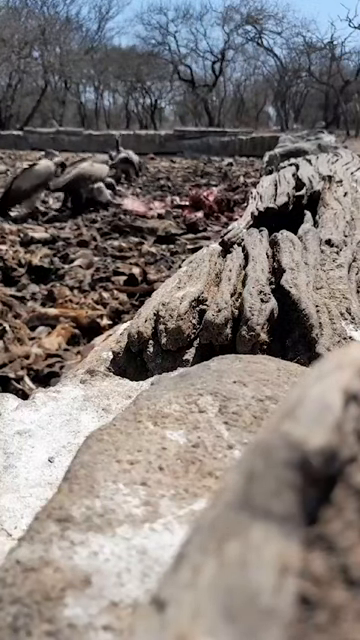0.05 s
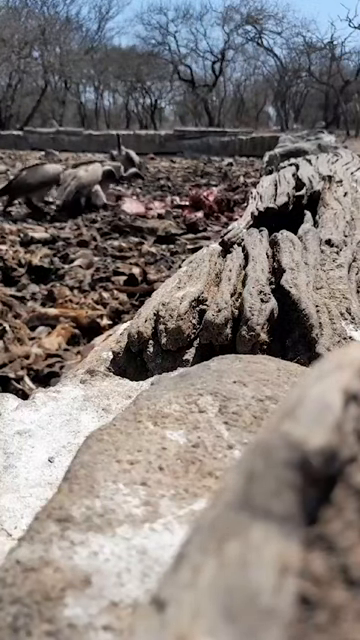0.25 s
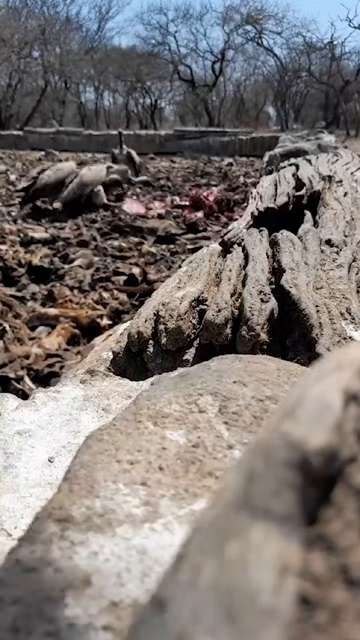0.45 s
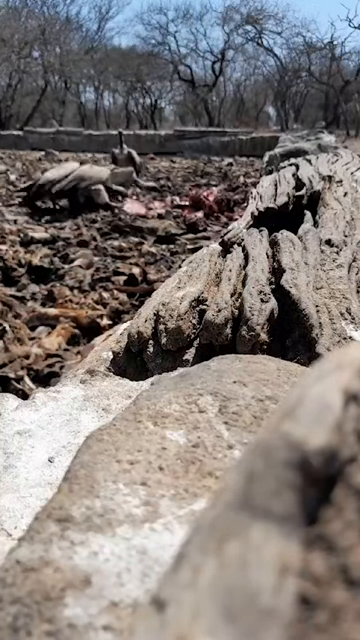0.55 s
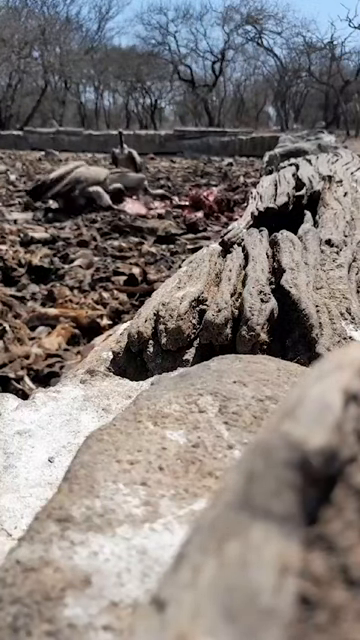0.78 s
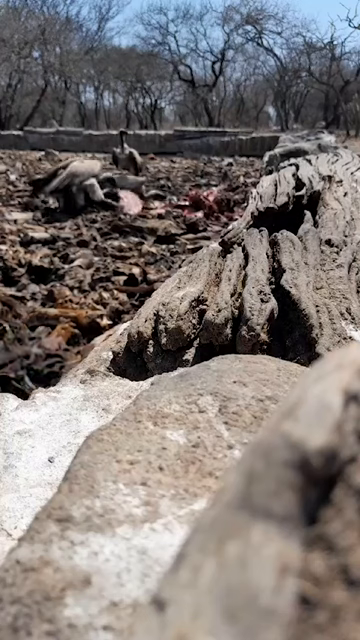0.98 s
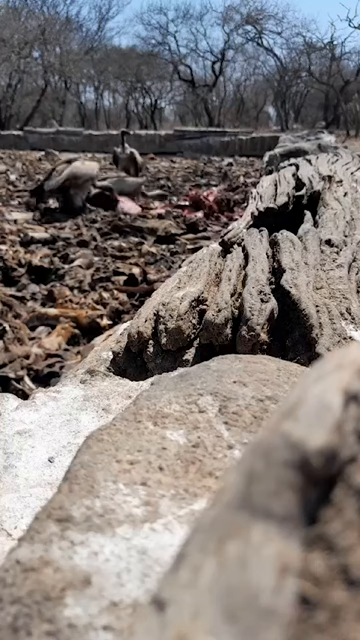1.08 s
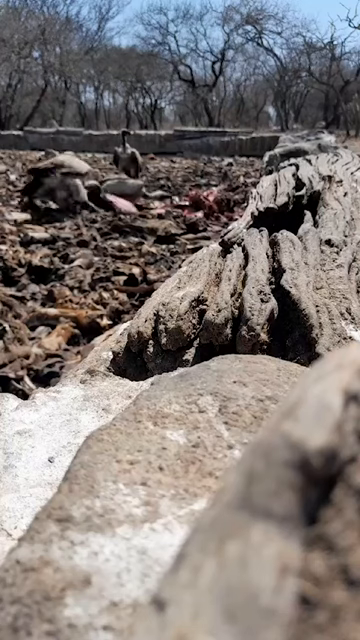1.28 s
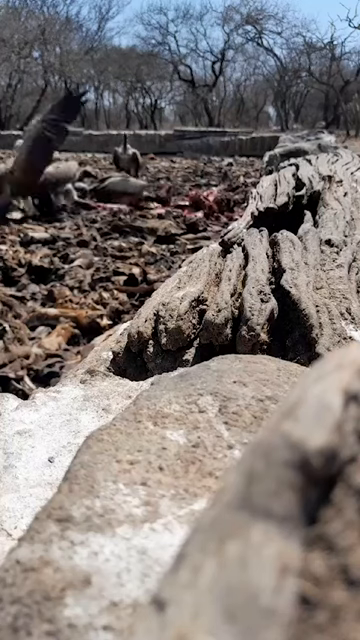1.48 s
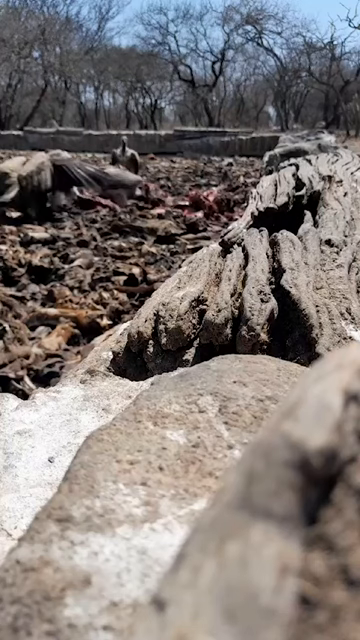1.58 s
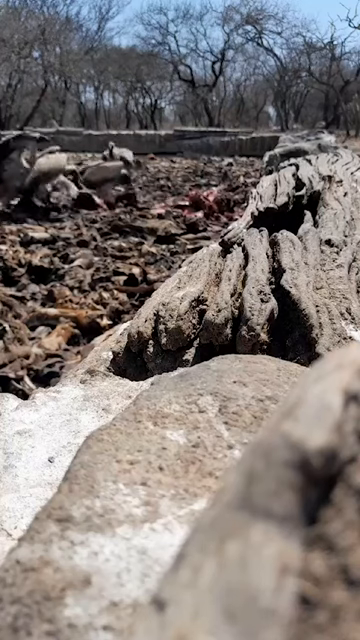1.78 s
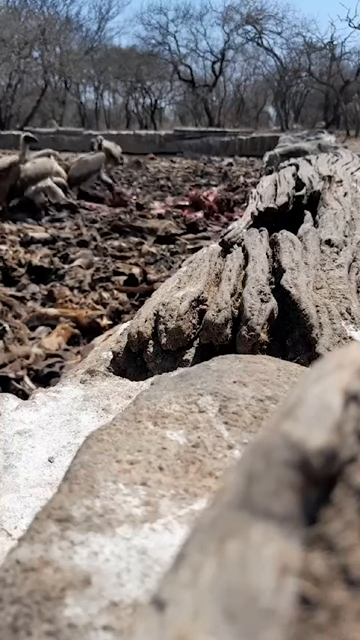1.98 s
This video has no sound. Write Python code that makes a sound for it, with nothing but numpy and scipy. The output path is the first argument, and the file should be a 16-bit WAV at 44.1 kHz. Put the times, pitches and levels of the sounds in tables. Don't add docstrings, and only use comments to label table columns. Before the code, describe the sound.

Two grating vulture calls, each buzzing then breaking into a rasp, amid wing claps and rustling.

```python
import sys
import numpy as np
from scipy import signal
from scipy.fft import rfft, irfft
from scipy.io import wavfile
from scipy.ndimage import uniform_filter1d

SR = 44100
rng = np.random.default_rng(int(sys.argv[2]) if len(sys.argv) > 2 else 0)


def pcm_store(signal):
    levels = np.round(np.clip(np.atleast_2d(signal), -1, 1) * 32767)
    wavfile.write(sys.argv[1], SR, levels.astype(np.int16).T)


def attenuation_scalar(level_db):
    decades = np.asarray(level_db, float) / 20
    return 10 ** decades


N = 90404

# [t/s, level/dB, pulse rate f/Hz]
BUZZ_CURVES = [
    [(0.312, -65, 88.1), (0.35, -42.5, 86), (0.444, -44, 90.83), (0.61, -40.5, 92.15), (0.652, -46, 94.5),
     (0.69, -31, 95.3)],
    [(1.19, -54, 84.82), (1.214, -38.5, 88.6), (1.246, -40.5, 91.94), (1.432, -44, 93.5),
     (1.486, -43, 95.6), (1.54, -28, 102.6)],
]
# [f/Hz, width/Hz, level/dB]
BUZZ_THROATS = [
    [(850, 300, -12.5), (1080, 340, -2), (1247, 74, 6.5), (1460, 210, -3.5), (1806, 147, -6.5),
     (2098, 92, -15), (3240, 630, -22), (4550, 620, -24)],
    [(795, 135, -13), (1040, 250, 2.5), (1225, 260, -1.5), (1514, 184, 1), (1873, 95, -6.5), (2058, 51, -7),
     (3500, 400, -18.5), (4800, 1500, -24)],
]
# [f/Hz, width/Hz, level/dB]
CLOSED_BEAK = [(1360, 340, 0), (4500, 700, -28)]
# [t/s, level/dB, pulse rate f/Hz]
RASP_CURVES = [
    [(0.625, -45, 88.16), (0.66, -38.5, 87.0), (0.724, -37.5, 79.56), (0.772, -35.5, 79.33),
     (0.915, -37, 78.52), (0.96, -60, 80.8)],
    [(1.48, -64, 90.3), (1.528, -39, 86.86), (1.574, -36.5, 86.3), (1.684, -36.5, 87.23),
     (1.748, -40, 88.4), (1.79, -83, 84.4)],
]
# [f/Hz, width/Hz, level/dB]
RASP_THROATS = [
    [(496, 300, -14), (1110, 78, 6), (1282, 220, 6.5), (1527, 132, 7.5), (1850, 340, -15), (2650, 300, -21),
     (3230, 480, -13), (4550, 500, -15), (5200, 500, -22), (12000, 6000, -48)],
    [(534, 270, -15), (1144, 240, 4), (1288, 69, 4.5), (1480, 208, 5), (1920, 67, -14.5), (3350, 630, -15),
     (4650, 950, -21.5), (12100, 6000, -40)],
]
# [f/Hz, lag/radians, level/dB]
FAR_PORT_BEND = [(0, 0, 0), (600, .8, 0), (800, 1.3, 0), (950, 3.3, 0), (1300, 4.3, 0), (1600, 4.4, 0),
                 (1850, 6.5, -3), (2600, 6.8, -5), (3400, 8.2, -2), (3800, 8.6, 0), (4400, 7.3, 0),
                 (5200, 8.8, 0)]
# [t/s, length/s, thump level/dB, thump f/Hz, feather swish level/dB]
WING_BEATS = [(0.223, 0.042, -43.5, 122.7, -47), (0.495, 0.026, -36.5, 130, -36),
              (0.837, 0.11, -52, 116.8, -39.5), (0.896, 0.036, -39, 112.4, -62),
              (0.994, 0.041, -31, 117, -37.5), (1.086, 0.11, -42, 88, -42), (1.281, 0.038, -39.5, 85, -53),
              (1.363, 0.042, -38, 83.9, -45.5), (1.402, 0.043, -39, 97, -54),
              (1.538, 0.046, -37.5, 85.6, -40), (1.578, 0.101, -38, 88.2, -48),
              (0.625, 0.011, -41.5, 100, -75)]
# [t/s, peak level/dB, f/Hz]
WING_CLAPS = [(0.016, -39.5, 356), (0.213, -26.5, 516), (0.48, -26, 490), (0.735, -10.5, 541),
              (0.986, -17.5, 526), (1.063, -32.5, 310), (1.081, -30.5, 428), (1.17, -25, 385),
              (1.254, -25, 410), (1.286, -36.5, 388), (1.367, -29, 375), (1.666, -22.5, 560),
              (1.752, -24.5, 616), (1.78, -30, 640), (1.836, -34.5, 1580)]
# [t/s, peak level/dB]
FEATHER_TICKS = [(.0957, -44), (.231, -38), (.272, -38), (.57, -42), (.785, -35), (1.082, -38),
                 (1.104, -38), (1.108, -28), (1.114, -32), (1.124, -31), (1.135, -27), (1.152, -36),
                 (1.170, -29), (1.199, -38), (1.355, -43), (1.753, -32), (1.826, -44), (1.871, -44),
                 (1.937, -44)]
# [t/s, length/s, level/dB]
FEATHER_RUSTLES = [
    (1.102, .085, -45),
    (.49, .03, -59),
    (.225, .04, -62),
    (1.01, .03, -59),
    (1.815, .04, -59),
    (1.195, .11, -57),
    (.84, .08, -60),
    (1.745, .02, -54),
]
# [f/Hz, width/Hz, level/dB]
FEATHER_TONES = [(1980, 2500, -8), (4130, 1760, -3), (11880, 5400, -15.5)]
# [t/s, level/dB]
BUSTLE_CURVE = [(0.0, -63.5), (0.48, -52.5), (0.66, -46.5), (0.85, -43.5), (0.95, -50), (1.11, -50),
                (1.63, -47), (1.94, -55.5), (2.05, -56.5)]
# [f/Hz, level per Hz/dB]
GROUND_COLOUR = [(150, -18), (330, -1.5), (550, -1.5), (800, -14.5), (1500, -14.5), (2500, -14),
                 (3800, -18.5), (6000, -30.5)]
# [t/s, level/dB]
LEAF_CURVE = [(0, -88), (.45, -72), (.8, -62), (1.05, -67), (1.3, -60.5), (1.7, -62), (1.8, -65),
              (2.05, -65)]
# [t/s, left level/dB, right level/dB]
WIND_CURVES = [(0, -50, -44.5), (.2, -74, -61), (.5, -61.5, -51.5), (.9, -56.5, -49), (1.3, -72, -47.5),
               (1.649, -43, -40), (1.78, -96, -50.5), (1.9, -81, -44.5), (2.05, -77, -56)]


def rms_one(x):
    return x / np.sqrt(np.mean(x ** 2) + 1e-20)


def in_time(rows):
    t, *columns = np.transpose(rows)
    return [np.interp(np.arange(N) / SR, t, column) for column in columns]


def drift(rate_hz):
    r = np.exp(-2 * np.pi * rate_hz * 40 / SR)
    slow = signal.lfilter([1], [1, -2 * r, r * r], rng.standard_normal(N // 40 + 2002))[2000:]
    return np.interp(np.arange(N) / 40, np.arange(len(slow)), rms_one(slow))


def band(x, low_hz, high_hz, order=2):
    return signal.sosfilt(signal.butter(order, [low_hz, high_hz], "band", fs=SR, output="sos"), x)


def resonances(x, table, order=1):
    out = 0
    for k, (hz, width_hz, db) in enumerate(table):
        r = np.exp(-np.pi * width_hz / SR)
        ring = [2, -4 * r * np.cos(2 * np.pi * hz / SR), 2 * r * r]
        y = x
        for _ in range(order):
            y = signal.lfilter([1 - r * r, 0, r * r - 1], ring, y)
        out = out + (-1) ** k * attenuation_scalar(db) * y
    return out


def window(start, length, rise, fall):
    t = np.arange(N) / SR - start
    return np.sin(np.pi / 2 * np.clip(np.minimum(t / rise, (length - t) / fall), 0, 1)) ** 2


def smear(x):
    for delay_s in (.0008, .0013):
        taps = np.zeros(int(delay_s * SR) + 1)
        taps[[0, -1]] = .4, 1
        x = signal.lfilter(taps, taps[::-1], x)
    return x


def ports(x, lead_s, pan_db=0.):
    turn = np.exp(-1j * np.pi * np.arange(N + 1) / N * lead_s * SR)
    late = irfft(rfft(x, 2 * N) * turn)[:N]
    return np.array([x * attenuation_scalar(pan_db / 2), late * attenuation_scalar(-pan_db / 2)])


def round_housing(x):
    hz, lag, db = np.transpose(FAR_PORT_BEND)
    grid_hz = np.arange(N + 1) / N * SR / 2
    bend = attenuation_scalar(np.interp(grid_hz, hz, db)) * np.exp(-1j * np.interp(grid_hz, hz, lag))
    return np.array([x, irfft(rfft(x, 2 * N) * bend)[:N]])


def buzz():
    waver_db, spread, breath, wobble = 2.6, 2.5, .42, .003
    beak_opens_s, closed_db = .1, -1.5
    out = 0
    for rows, throat in zip(BUZZ_CURVES, BUZZ_THROATS):
        start, end = rows[0][0], rows[-1][0]
        db, hz = in_time(rows)
        phase = 2 * np.pi * np.cumsum(hz * (1 + wobble * drift(25.4))) / SR
        harmonics = 0
        for k in range(5, 56):
            tone = np.cos(k * phase + spread * rng.standard_normal())
            harmonics = harmonics + attenuation_scalar(waver_db * drift(7.8)) * tone
        airflow = 1 + np.cos(phase)
        source = rms_one(harmonics) + breath * rng.standard_normal(N) * airflow
        clicks = np.diff(phase // (2 * np.pi), prepend=0)
        sharp = rms_one(smear(smear(clicks))) + .9 * airflow * rng.standard_normal(N)
        opened = window(start, 1, beak_opens_s, 1e-3) ** 2
        open_voice = rms_one(resonances(source, throat, order=2))
        closed_voice = attenuation_scalar(closed_db) * rms_one(resonances(sharp, CLOSED_BEAK, order=2))
        voice = opened * open_voice + (1 - opened) * closed_voice
        out = out + window(start, end - start, 0.0076, 0.049) * attenuation_scalar(db + 6.5) * voice
    return out


def rasp():
    jitter, uneven_db, strong_weak_db = .006, 1.2, .5
    second_slap_cycle, second_slap_db = .42, -4
    breath, puff_fade = .2, 3.2
    count = np.arange(250)
    out = 0
    for rows, throat in zip(RASP_CURVES, RASP_THROATS):
        start, end = rows[0][0], rows[-1][0]
        db, hz = in_time(rows)
        cycle = np.cumsum(hz) / SR
        chance = rng.standard_normal((250, 3))
        size = attenuation_scalar(uneven_db * chance[:, 0] + strong_weak_db * (-1.) ** count)
        first = np.searchsorted(cycle, count + jitter * chance[:, 1])
        second = np.searchsorted(cycle, count + second_slap_cycle + 2 * jitter * chance[:, 2])
        pulses = np.zeros(N + 1)
        pulses[first] = size
        pulses[second] = size * attenuation_scalar(second_slap_db)
        puff = np.exp(-puff_fade * (cycle % 1)) * size[cycle.astype(int)] * rng.standard_normal(N)
        source = (1 - breath) * rms_one(smear(pulses[:N])) + breath * rms_one(puff)
        voice = rms_one(resonances(source, throat, order=2))
        out = out + window(start, end - start, 0.049, 0.0058) * attenuation_scalar(db + 6) * voice
    return out


def beats():
    overtone, gust_share = 0.083, .6
    noise = rng.standard_normal(N)
    wobble = 1 + .12 * drift(25)
    lumps = attenuation_scalar(0.56 * drift(70))
    gust = rms_one(band(noise, 31.0, 181))
    swish_tones = [(340, 264, 0), (3500, 3000, -28)]  # f/Hz, width/Hz, level/dB
    swish = rms_one(resonances(noise * attenuation_scalar(3.0 * drift(95)), swish_tones, order=2))
    out = 0
    for start, length, db, hz, swish_db in WING_BEATS:
        turn = 2 * np.pi * hz * np.cumsum(wobble) / SR
        thump = (np.sin(turn) + overtone * np.sin(2 * turn)) * lumps + gust_share * gust
        beat = attenuation_scalar(db) * thump + attenuation_scalar(swish_db) * swish
        out = out + window(start, length, 0.12 * length, 0.49 * length) * beat
    return out


def claps():
    rise_cycles, fade_cycles, bite = 1, 1.094, 0.25
    t, out = np.arange(N) / SR, 0
    for start, db, hz in WING_CLAPS:
        cycles = np.clip((t - start) * hz, 0, 40)
        knock = np.sin(2 * np.pi * cycles) + bite * np.sin(4.6 * np.pi * cycles)
        shape = (1 - np.exp(-(cycles / rise_cycles) ** 2)) * np.exp(-cycles / fade_cycles)
        out = out - attenuation_scalar(db + 4) * knock * shape
    return out


def feathers():
    tick_s, tick_db, body_db, grains_per_s = .0012, -3, 1.0, 1500
    t, noise = np.arange(N) / SR, rng.standard_normal(N)
    tick_shape = sum(attenuation_scalar(db) * (t > s) * np.exp(-np.abs(t - s) / tick_s) for s, db in FEATHER_TICKS)
    tick_noise = band(noise, 7000, 15500) + attenuation_scalar(body_db) * band(noise, 1200, 5500)
    ticks = tick_shape * attenuation_scalar(tick_db) * tick_noise
    grain_size = attenuation_scalar(3 * np.minimum(rng.exponential(1, N), 3))
    grains = (rng.random(N) < grains_per_s / SR) * grain_size * rng.choice([-1, 1], N)
    rustle = rms_one(resonances(rms_one(grains) + 0.16 * noise, FEATHER_TONES, order=2))
    rubbing = sum(attenuation_scalar(db) * window(s, length, .005, .45 * length) for s, length, db in FEATHER_RUSTLES)
    return ticks + rustle * rubbing


def bustle():
    patchy_db, own_share = 3.5, 0.68
    hz, db = np.transpose(GROUND_COLOUR)
    white = rng.standard_normal((2, 3, N))
    together = drift(14)
    edges_hz = 130 * 2 ** np.arange(0, 6.1, .5)
    out = 0
    for k, (low, high) in enumerate(zip(edges_hz, edges_hz[1:])):
        colour_db = np.interp(np.log(low * high) / 2, np.log(hz), db)
        gain_db = colour_db + patchy_db * (0.14 * together + drift(33.8))
        out = out + attenuation_scalar(gain_db) * band(white[k % 2], low, high)
    out = rms_one(out)
    return attenuation_scalar(in_time(BUSTLE_CURVE)[0] + 2) * (ports(out[0], .0002, 0.31) + own_share * out[1:])


def leaves():
    hiss = rms_one(band(rng.standard_normal((2, N)), 9800, 18000, order=3))
    return attenuation_scalar(in_time(LEAF_CURVE)[0] + 1.4 * drift(8)) * hiss


def wind():
    rumble = band(rng.standard_normal((2, N)), 50.3, 127)
    return np.array([attenuation_scalar(db + 1.5 * drift(5.7)) * rms_one(r) for db, r in zip(in_time(WIND_CURVES), rumble)])


def scene():
    echo_s, echo_db = .013, -10
    call = buzz() + rasp()
    echo = attenuation_scalar(echo_db) * np.roll(call, int(echo_s * SR))
    birds = round_housing(call + echo)
    wings = ports(beats(), .00014, 0.13) + ports(claps(), .00014, 1.2) + ports(feathers(), .0002, 0.64)
    return birds + wings + bustle() + leaves() + wind()


def roll_off(x):
    return signal.sosfilt(signal.butter(12, 15790, fs=SR, output="sos"), x)


def record(dry):
    air_db, hiss_db = -57.5, [[-56.5], [-74]]
    loudness = np.sqrt(uniform_filter1d(dry[0] ** 2, size=4000) + 1e-9)
    level = (loudness / attenuation_scalar(-48.5)) ** 0.22
    dry = dry + attenuation_scalar(air_db) * level * band(rng.standard_normal(dry.shape), 600, 2500)
    hiss = band(rng.standard_normal(dry.shape), 1170, 11800, order=1) * attenuation_scalar(hiss_db) * level
    hiss[1] *= attenuation_scalar(drift(33))
    dip = signal.cheby2(7, 30, 5300 * 1.23, fs=SR, output="sos")
    right = signal.sosfiltfilt(dip, dry[1])
    right = right + band(attenuation_scalar(-3.5) * dry[1] + hiss[1], 8800, 15100, order=3)
    x = np.array([dry[0] + hiss[0], right])
    x = signal.sosfilt(signal.butter(2, 42.6, "high", fs=SR, output="sos"), x)
    x = signal.sosfilt(signal.cheby2(14, 70, 16200, fs=SR, output="sos"), x)
    return roll_off(x)


dry = scene()
out = record(dry)
pcm_store(out)
```